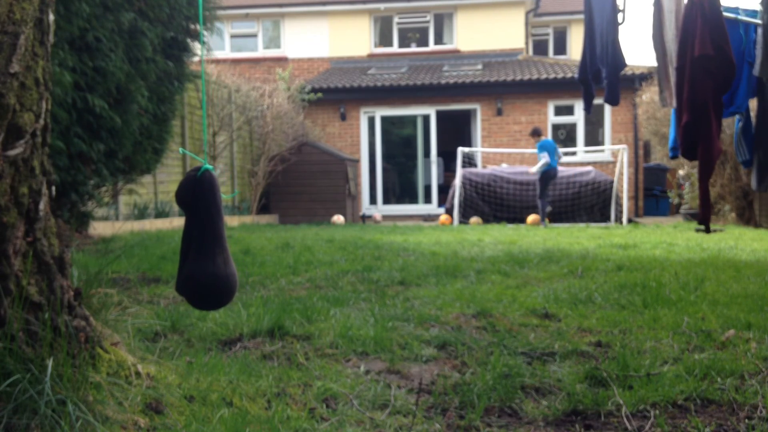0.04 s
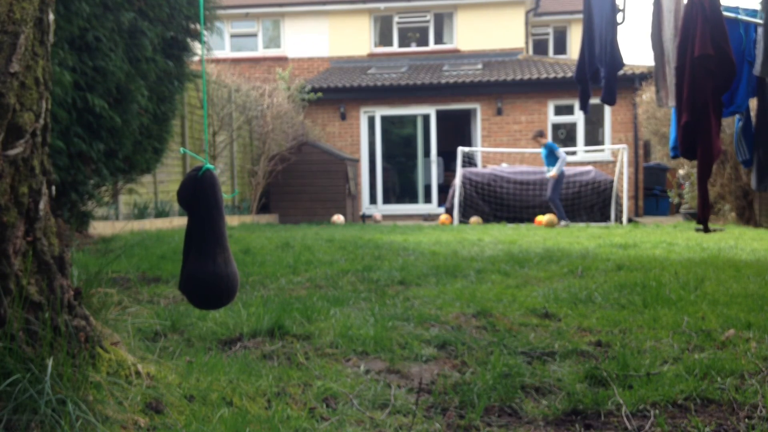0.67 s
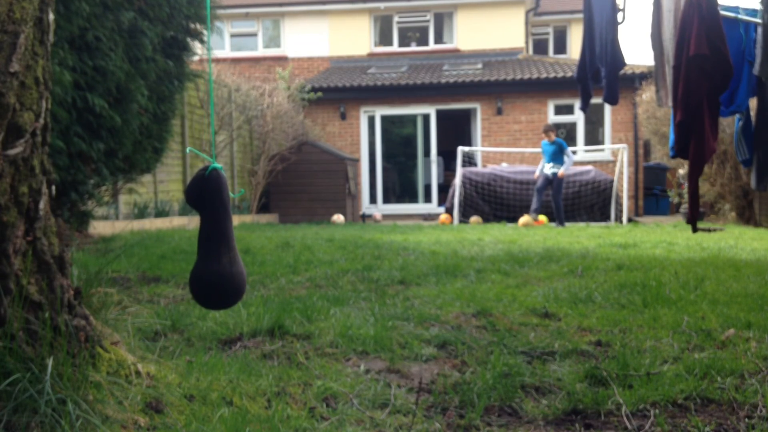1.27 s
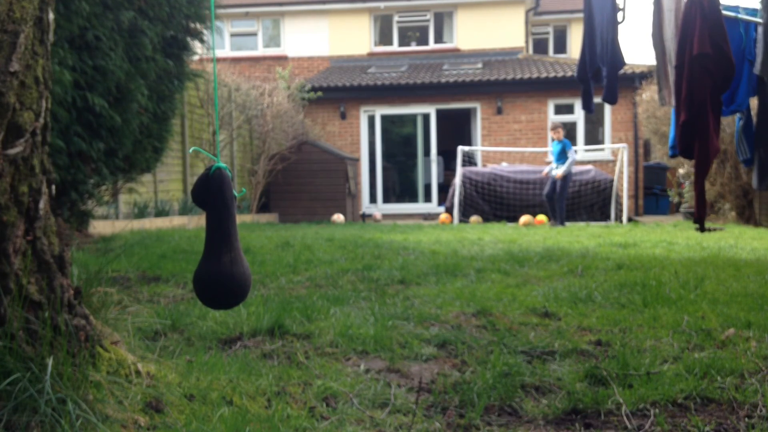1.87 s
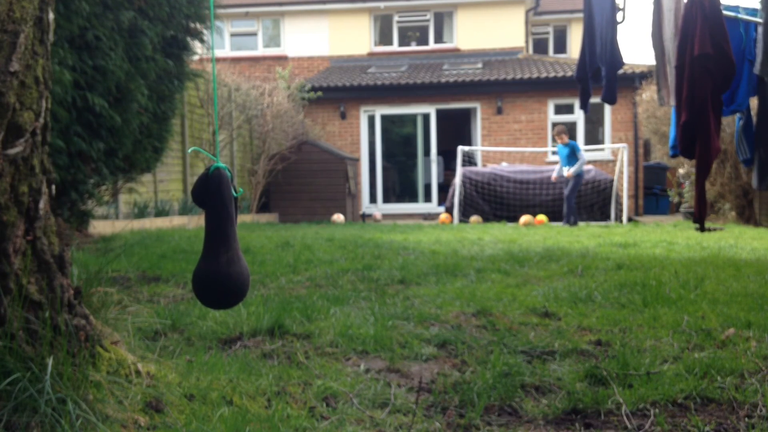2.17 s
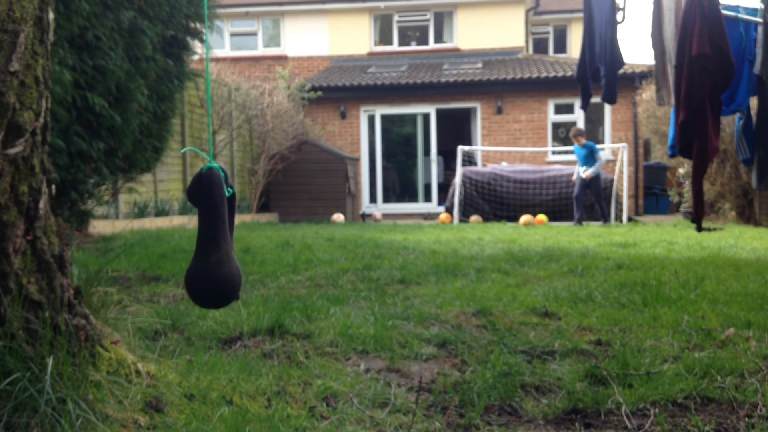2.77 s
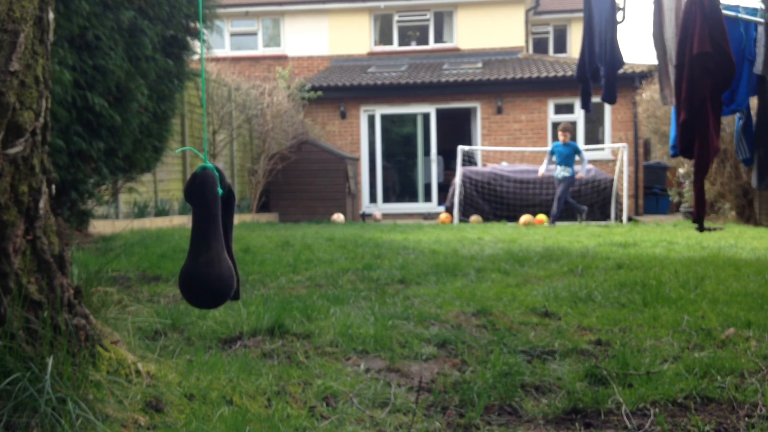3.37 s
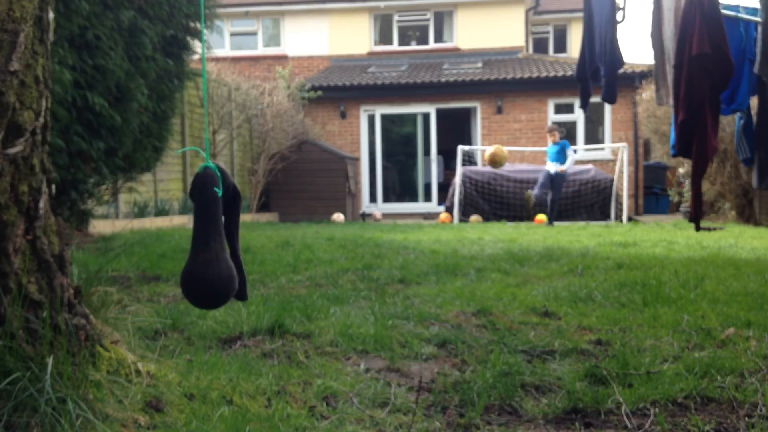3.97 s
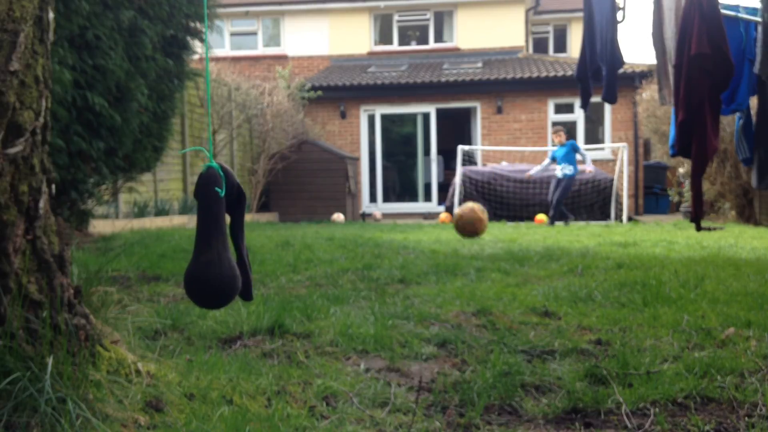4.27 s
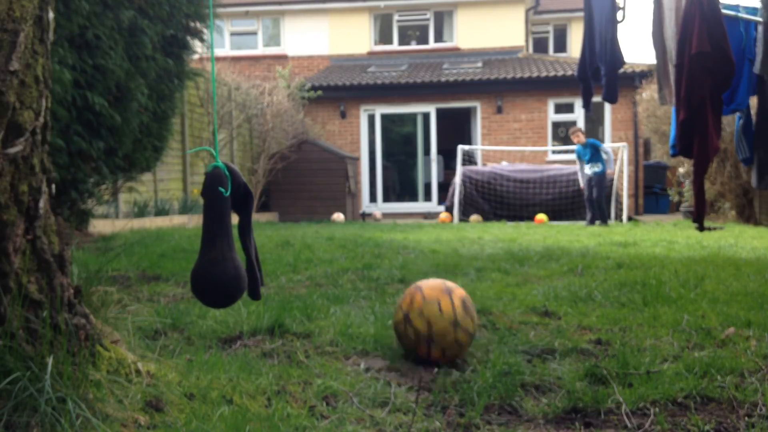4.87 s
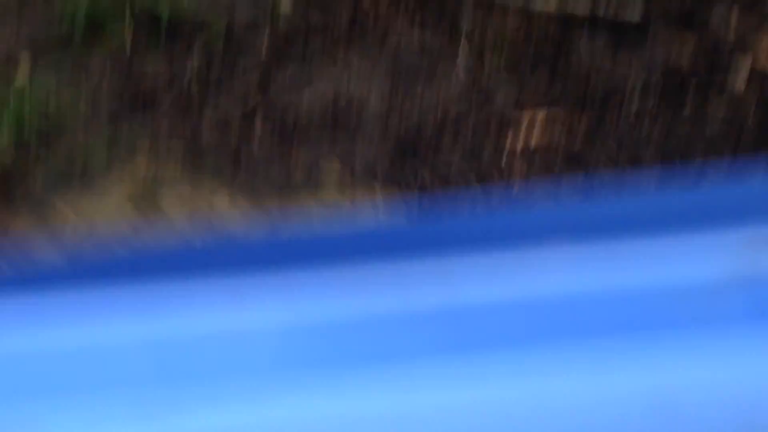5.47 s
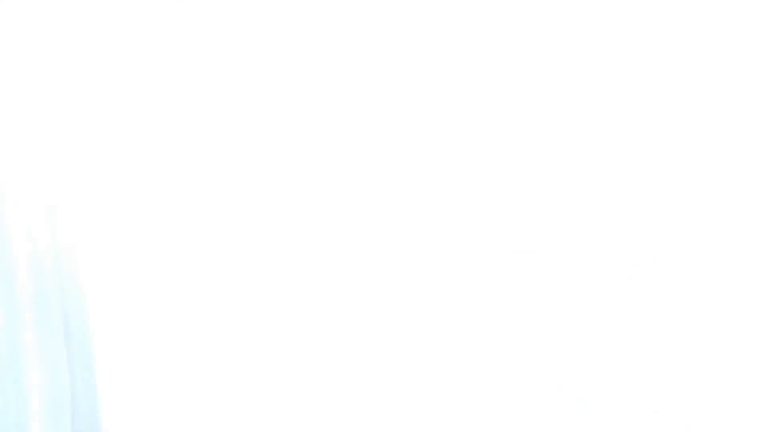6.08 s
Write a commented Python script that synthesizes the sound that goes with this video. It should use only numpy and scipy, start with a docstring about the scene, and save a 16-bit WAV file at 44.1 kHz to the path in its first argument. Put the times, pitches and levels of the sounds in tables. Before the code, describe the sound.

Faint birds and an engine drone, a football kicked and bouncing on grass, then loud close knocks and scrapes as the camera topples.

```python
"""A distant engine drones under soft garden air; grass swishes and small birds whistle and trill. At 3.7 s a
boot slaps a football at the far end, and fences and house send the thud back. The ball bounces three times,
crushing the grass, the last time just beside the camera, and hits the camera at 5.41 s. The camera tumbles, its
casing ringing with knocks and clicks, slides down a plastic surface and lands hard near 5.95 s."""
import sys
import numpy as np
from scipy import signal
from scipy.fft import rfft, irfft
from scipy.io import wavfile
from scipy.ndimage import uniform_filter1d

SR = 44100
rng = np.random.default_rng(int(sys.argv[2]) if len(sys.argv) > 2 else 0)


def waveform_to_disk(signal):
    """Save audio, clipped to [-1, 1], as 16-bit WAV at the path in sys.argv[1]."""
    frames = np.transpose(np.atleast_2d(signal))
    scaled = np.clip(frames, -1, 1) * 32767
    samples = np.round(scaled).astype(np.int16)
    wavfile.write(sys.argv[1], SR, samples)


N = 270597
TIME = np.arange(N) / SR


def undb(db):
    """Decibels to gain."""
    return 10 ** (np.asarray(db) / 20)


def unit(x):
    """Scale to rms 1."""
    return x / np.sqrt(np.mean(x ** 2))


def seconds(length):
    """A time axis of the given length."""
    return np.arange(int(length * SR)) / SR


def curves(table):
    """The columns of a timed table, one value a sample."""
    times, *columns = np.transpose(table)
    return [np.interp(TIME, times, column) for column in columns]


def add(out, start, x):
    """Mix x into out at start seconds."""
    i = int(start * SR)
    out[i:i + len(x)] += x[:len(out) - i]


def colour(x, spectrum):
    """Equalise x through (Hz, dB) points; rms 1."""
    hz, db = np.transpose(spectrum)
    bins_hz = np.maximum(np.fft.rfftfreq(len(x), 1 / SR), 1)
    gain = undb(np.interp(np.log(bins_hz), np.log(hz), db))
    return unit(irfft(rfft(x) * gain, len(x)))


def band(x, lo_hz, hi_hz, order=2):
    """Causal band-pass."""
    edges = [lo_hz, min(hi_hz, .45 * SR)]
    return signal.sosfilt(signal.butter(order, edges, "band", fs=SR, output="sos"), x)


def walk(per_second):
    """Smooth random wander; rms 1."""
    hold = int(SR / per_second)
    steps = np.repeat(rng.standard_normal(N // hold + 1), hold)
    return unit(uniform_filter1d(steps, hold)[:N])


def grit(spread_db, grain_samples=4):
    """Dense tiny contacts: noise in which a few grains stand far out."""
    sizes = undb(spread_db * np.minimum(rng.exponential(size=N // grain_samples + 1), 5))
    return rng.standard_normal(N) * np.repeat(sizes, grain_samples)[:N]


def blow(hz, cycles, rise=0.22):
    """A cushioned push that swings out within a few cycles; peak 1."""
    turns = hz * seconds(.12)
    swing = np.sin(2 * np.pi * turns) * np.exp(-turns / cycles) * (1 - np.exp(-turns / rise))
    return swing / np.abs(swing).max()


def garden(x, t60, wet_db):
    """Add the diffuse return from fences, hedges and the house."""
    t = seconds(.7)
    tail = rng.standard_normal(len(t)) * undb(-60 * t / t60) * (1 - np.exp(-t / 0.0041))
    return x + undb(wet_db) * signal.fftconvolve(x, tail / np.linalg.norm(tail))[:N]


# The tone of the open air. Each row: frequency in Hz, relative level in dB.
AIR_EQ = [(30, 2.5), (300, -3), (550, -5), (1200, -4.5), (3500, -8.5), (5000, -15.5), (9000, -20.5),
          (15000, -26), (16000, -35)]
# The swell of far traffic. Each row: time in seconds, level in dB.
TRAFFIC_SWELL = [(0, -66), (.7, -61), (1.3, -66), (2.3, -68)]


def air():
    """The bed: soft outdoor hiss and a swell of far traffic."""
    hiss = colour(rng.standard_normal(N), AIR_EQ)
    traffic_eq = [(100, -17), (300, 14), (550, 6), (950, 9), (1800, -9), (6000, -56)]
    traffic = colour(rng.standard_normal(N), traffic_eq)
    return hiss * undb(-63.5 + 0.048 * walk(3.74)) + traffic * undb(curves(TRAFFIC_SWELL)[0])


# The engine's drone. Each row: time in seconds, firing rate in Hz, level of the second order in dB.
ENGINE_RUN = [(0, 72, -55.5), (1.2, 74, -56), (1.9, 73, -51), (2.8, 73.7, -57)]


def engine():
    """Two strong firing orders and three weak ones waver with distance over a rumble."""
    firing_hz, second_db = curves(ENGINE_RUN)
    first_db = -43.5 - 1.83 * TIME  # fades as the engine moves off
    phase = 2 * np.pi * np.cumsum(firing_hz * (1 + 0.0045 * walk(14))) / SR
    orders_db = [first_db, second_db, second_db - 18, second_db - 13, second_db - 27.5]
    drone = sum(np.sqrt(2) * undb(db + walk(7.2)) * np.sin(k * phase)
                for k, db in enumerate(orders_db, 1))
    rumble_eq = [(20, -21), (48, -3), (90, -2), (125, -1.5),
                 (210, -11.5), (320, -20.5), (600, -34.5), (4000, -82)]
    return drone + undb(-51.5) * colour(rng.standard_normal(N), rumble_eq)


# Feet and ball brushing the lawn, and the crack of the kick at 3.73 s. Each row: centre in seconds, level in
# dB, half length in seconds.
LAWN_SWISHES = [(0.12, -65, 0.043), (2.547, -72, 0.05), (3.377, -67.5, 0.062), (3.683, -52.5, 0.0089),
                (3.732, -47, 0.019), (4.36, -63, 0.038), (4.522, -63, 0.077)]


def swishes():
    """Grass blades bend and spring back in soft swells."""
    swell = sum(undb(db) * np.exp(-((TIME - centre) / half) ** 2 / 2) for centre, db, half in LAWN_SWISHES)
    return swell * colour(grit(2.0), [(100, 11.5), (600, 12), (2000, -5), (8000, -2.5), (16000, -15)])


# Sharp snaps. Each row: start in seconds, relative level in dB, brightness in Hz.
SNAPS = [(0.117, -39, 7000), (5.1513, -28.5, 7500), (5.301, -6.5, 4300), (5.4088, -4, 6900),
         (5.4627, -6.5, 5600), (5.4776, -7.5, 7100), (5.5387, -4.5, 7600), (5.556, -16.5, 3700),
         (5.5937, 1, 6840), (5.5982, 0, 9300), (5.6222, -3.5, 7200), (5.6489, 0.5, 4130),
         (5.661, -19, 4000), (5.685, -10, 3540), (5.6886, -4, 3960), (5.7178, -9, 5500),
         (5.727, -0.5, 3630), (5.731, -10, 1960), (5.74, -7, 6300), (5.7987, -23.5, 3600),
         (5.9377, -9, 1750), (5.949, -7, 1900), (5.9611, -3.5, 2620)]


def clicks():
    """Twigs and hard edges snap: one sharp spike, then a short chatter."""
    out, t = np.zeros(N), seconds(.03)
    for start, db, hz in SNAPS:
        decay_s = .0011 * (3960 / hz) ** 1.2  # duller snaps chatter longer
        chatter = rng.standard_normal(len(t)) * np.exp(-t / decay_s)
        chatter *= np.sqrt(decay_s * SR / 2) / np.linalg.norm(chatter)  # length sets its energy
        chatter[0] = -1.35  # the spike
        snap = band(chatter, hz / 2, hz * 1.095, order=1) * np.sqrt(SR / hz)
        add(out, start, undb(db - 11) * snap)
    return out


def whistle(length, start_hz, end_hz, trill):
    """One bird phrase: a glide that trills in pitch and breaks into falling syllables."""
    t = seconds(length)
    syllable = (t * 17) % 1
    waver = 0.78 * np.sin(2 * np.pi * 70 * t) + 0.403 * walk(400)[:len(t)] + 1 - 2 * syllable
    hz = np.linspace(start_hz, end_hz, len(t)) * (1 + trill * waver + 0.0081 * walk(45.2)[:len(t)])
    envelope = np.sin(np.pi * syllable) * signal.windows.tukey(len(t), .3)
    flutter = undb(3 + 2 * walk(56)[:len(t)])
    return envelope * flutter * np.sin(2 * np.pi * np.cumsum(hz) / SR)


# The nearer birds. Each row: start and length in seconds, pitch in Hz, relative level in dB,
# trill depth as a share of the pitch.
BIRD_PHRASES = [(0.524, .12, 3900, -69.5, .12), (0.734, 0.16, 5060, -64, 0.058),
                (1.175, .058, 5500, -70, .03), (1.767, .08, 4840, -70, 0.035),
                (2.035, 0.13, 6670, -73.5, 0.066), (2.213, 0.12, 7540, -68.5, 0.047),
                (2.5, .032, 3340, -64.5, 0.042), (2.855, 0.11, 4290, -70.5, 0.07),
                (2.93, 0.35, 3560, -70, 0.019), (3.133, 0.056, 4600, -69.5, .063),
                (3.16, 0.31, 7750, -74.5, 0.053), (3.535, .024, 5850, -66, .01),
                (3.901, .25, 4110, -67.5, 0.0915), (4.153, .035, 4450, -67, .05),
                (4.298, .035, 4760, -70, .05), (4.513, .13, 7050, -71.5, .066),
                (5.172, .14, 3990, -67, .06)]


def birds():
    """Near songs over faint chirps from other gardens, scattered by trees and walls."""
    out = np.zeros(N)
    fall = .022  # a phrase glides from this share above its pitch to as far below
    for start, length, hz, db, trill in BIRD_PHRASES:
        add(out, start, undb(db) * whistle(length, hz * (1 + fall), hz * (1 - fall), trill))
    for when, pitch, slope in rng.random((30, 3)):
        hz = 3000 * 1.7 ** pitch
        far_chirp = whistle(0.0444, hz, hz * (1.06 - 0.139 * slope), trill=0.0063)
        add(out, when * N / SR, undb(-76.5) * far_chirp)
    return undb(-2) * garden(out, t60=0.59, wet_db=3)


# The kick and its echoes off fences and house. Each row: start in seconds, slap level in dB,
# slap pitch in Hz, thump in dB relative to the slap.
KICK_SLAPS = [(3.7161, -24.5, 536, 0.5), (3.7357, -28.5, 606, -11.5), (3.741, -25, 292, -8),
              (3.7586, -37.5, 470, 9.5)]


def kick():
    """The boot slaps the ball; the walls send the thud back."""
    out = np.zeros(N)
    for start, db, hz, thump_db in KICK_SLAPS:
        add(out, start, undb(db) * (blow(hz, cycles=0.97) + undb(thump_db) * blow(88, cycles=0.49)))
        add(out, start, undb(db - 18.5) * blow(1030, cycles=3.6))  # the air inside the ball pings
    return out


# The tone of crushed grass. Each row: frequency in Hz, relative level in dB.
GRASS_EQ = [(60, -1), (300, 14.5), (700, 8), (1400, -7.5), (4000, -2), (8000, -9), (12000, -12),
            (16000, -33)]
# The ball on the lawn. Each row: start in seconds, thump and ball ring in dB,
# seconds until it springs back, grass and blade tip gains in dB.
LAWN_BOUNCES = [(4.4469, -26, -23.5, 0.014, -26.5, -37.5), (4.9930, -30, -39, 0.025, -25, -39),
                (5.2890, -26.5, -24, .022, -18.5, -44)]


def bounces():
    """The ball crushes grass blades, thumps the soil and rings as it springs back."""
    out = np.zeros(N)
    blades = colour(grit(3.7), GRASS_EQ)
    thin_tips = unit(band(grit(2.3), 4700, 14000))
    crush_decay_s = 0.0096
    for start, thump_db, ring_db, contact_s, grass_db, tips_db in LAWN_BOUNCES:
        add(out, start + contact_s - .006, undb(thump_db) * blow(76, cycles=0.65))
        add(out, start + contact_s, undb(ring_db) * blow(507, cycles=0.82))
        age = np.maximum(TIME - start, 0) / crush_decay_s
        crush = (1 - np.exp(-2 * age)) * np.exp(-age)
        brush = np.exp(-np.abs(TIME - start - .003) / 0.0066)  # tall blades are touched before the soil
        out += undb(grass_db) * blades * crush + undb(tips_db) * thin_tips * brush
    return out


# Blows on the camera and the ground beside it. Each row: start in seconds, peak in dB, pitch in Hz.
TUMBLE_KNOCKS = [(5.2907, -21, 706), (5.4085, -11.5, 606), (5.4243, -6.5, 390), (5.4276, -4, 770),
                 (5.445, -14, 465), (5.507, -6.5, 503), (5.556, -17.5, 710), (5.5946, -4, 515),
                 (5.607, -8, 830), (5.6499, -7, 750), (5.686, -17.5, 580), (5.7169, -4, 420),
                 (5.7303, -9, 317), (5.778, -13, 640), (5.898, -18, 548), (5.936, -2, 570),
                 (5.9478, -6, 743), (5.9592, -1, 474), (5.9854, -14, 367)]


def knocks():
    """Each blow jolts the camera with a hard attack and a quick swing out."""
    out = np.zeros(N)
    for start, db, hz in TUMBLE_KNOCKS:
        add(out, start, undb(db) * blow(hz, cycles=0.92, rise=0.053))
    return out


# The ring of the casing. Each row: pitch in Hz, relative level in dB, seconds to fall by 60 dB.
CASING_MODES = [(106, -7, 0.14), (212.2, 2, 0.13), (380.7, -36, 0.0363), (549, -4, 0.11), (700, -3, 0.047),
                (1350, 21, 0.014), (1790, -5, 0.043), (2236, 16, 0.031), (3590, 9, 0.035)]


def casing(hits):
    """The hits, plus the modes they leave ringing in the camera's casing."""
    t = seconds(.25)
    ring = sum(undb(db - 60 * t / t60) * np.cos(2 * np.pi * hz * t) for hz, db, t60 in CASING_MODES)
    return hits + undb(-50.5) * signal.fftconvolve(hits, ring)[:N]


# The casing sliding freely. Each row: start and length in seconds, opening hiss in dB,
# growth in dB per second, rub in dB relative to the hiss.
SLIDE_STROKES = [(5.406, .098, -34, -28, -8), (5.497, 0.337, -55.5, -20, 5), (5.836, .115, -53, 67, 10),
                 (5.959, 0.173, -38.5, -49.5, -12.5)]


def slides():
    """Rub and hiss envelopes: each slide is one stroke that swells or fades until contact breaks."""
    rubbing, hissing, age = np.zeros(N), np.zeros(N), seconds(.45)
    attack_s, release_s = 0.0019, 0.0047
    for start, length, hiss_db, growth, rub_db in SLIDE_STROKES:
        contact = (1 - np.exp(-age / attack_s)) * np.exp(-np.maximum(age - length, 0) / release_s)
        stroke = undb(hiss_db + growth * age) * contact
        add(hissing, start, stroke)
        add(rubbing, start, undb(rub_db) * stroke)
    return rubbing, hissing


# The low rub and bright hiss of friction. Each row: frequency in Hz, relative level in dB.
RUB_EQ = [(30, 0), (85, 13), (200, 4.5), (550, 7.5), (1100, 1), (2200, -10.5), (3600, -13), (16000, -47)]
HISS_EQ = [(300, -30), (1500, -3.5), (4000, 1), (7000, 3.5), (12000, -0.5), (16000, -3.5)]


def friction(rubbing, hissing):
    """The casing drags over plastic and grit, catching and letting go."""
    catch = undb(2 * walk(per_second=150))
    rub = rubbing * colour(grit(2.5), RUB_EQ)
    hiss = hissing * colour(grit(2.1), HISS_EQ)
    return catch * (rub + hiss)


# The camera shaking as a whole. Each row: pitch in Hz, relative level in dB, decay in cycles.
THUD_MODES = [(66.6, -10, 2.2), (101.3, -1, 1.52), (163.7, -1, 1.6)]
# The heavy landings. Each row: start in seconds, thud and rub gains in dB, rub decay in seconds.
CAMERA_LANDINGS = [(5.417, -9.5, -14.5, 0.024), (5.596, -29.5, -16, 0.014), (5.652, -36, -24, 0.011),
                   (5.678, -29, -22.5, .018), (5.72, -23, -24.5, 0.028), (5.947, -15.5, -13, .018)]


def landings():
    """The camera's whole weight comes down and drags: thuds, then rub and hiss envelopes."""
    thuds, rubbing, age = np.zeros(N), np.zeros(N), seconds(.45)
    thud = sum(undb(db) * blow(hz, cycles) for hz, db, cycles in THUD_MODES)
    grip_s = 0.0043
    for start, thud_db, rub_db, decay_s in CAMERA_LANDINGS:
        add(thuds, start, undb(thud_db) * thud)
        drag = (1 - np.exp(-age / grip_s)) * np.exp(-age / decay_s)
        add(rubbing, start, undb(rub_db) * drag)
    return thuds, rubbing, undb(-21) * rubbing


def squeak():
    """The plastic squeaks faintly just before the last landing."""
    swell = np.exp(-np.abs(TIME - 5.885) / .044)
    return undb(-42) * swell * unit(band(grit(2.2), 1860, 2750))


def scene():
    """Ball and birds out in the garden, the tumble close up and dry."""
    background = air() + engine() + swishes() + birds()
    far_kick = garden(kick(), t60=0.18, wet_db=-5.5)
    nearer_bounces = garden(bounces(), t60=0.16, wet_db=-13)
    slide_rub, slide_hiss = slides()
    thuds, landing_rub, landing_hiss = landings()
    tumble = casing(clicks() + knocks() + thuds)
    scrape = friction(slide_rub + landing_rub, slide_hiss + landing_hiss)
    return (background + far_kick + nearer_bounces + tumble + scrape + squeak())[None]


def record(dry):
    """The microphone rounds the hardest blows; the deepest bass and the top are cut."""
    ceiling = 0.95
    rounded = ceiling * np.tanh(dry / ceiling)
    low_cut = signal.butter(2, 28, "high", fs=SR, output="sos")
    high_cut = signal.ellip(8, .2, 70, 15600, fs=SR, output="sos")
    return signal.sosfilt(high_cut, signal.sosfilt(low_cut, rounded))


dry = scene()
out = record(dry)
waveform_to_disk(out)
```